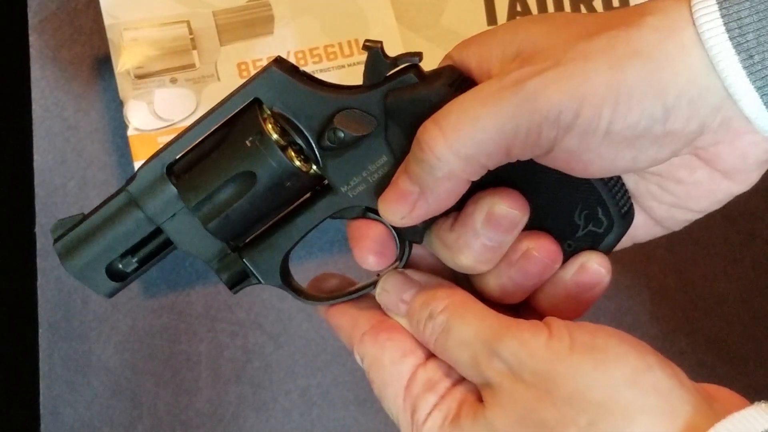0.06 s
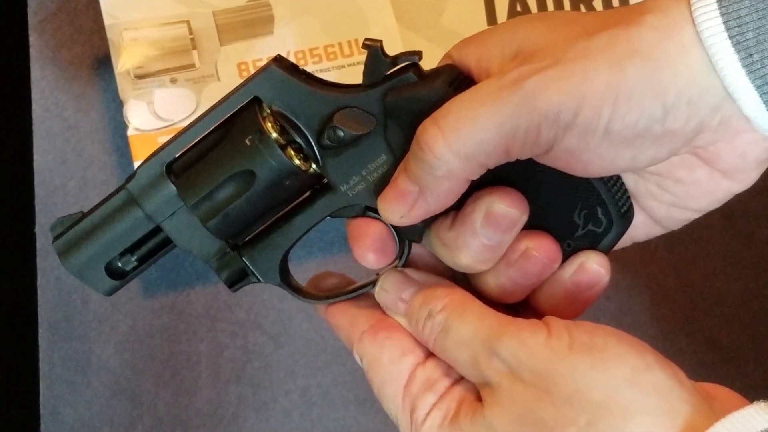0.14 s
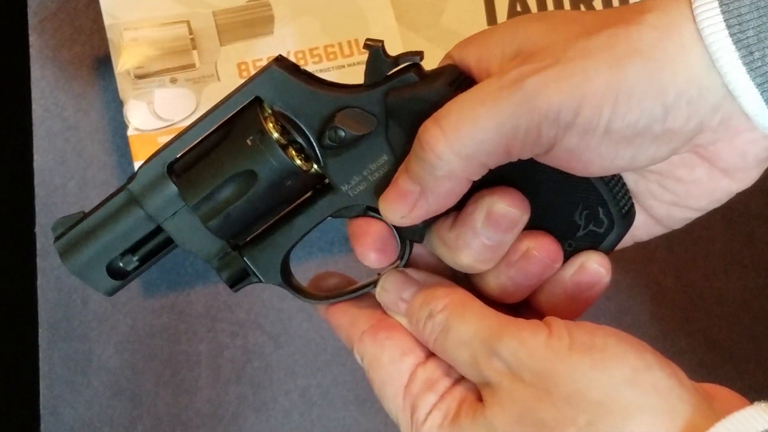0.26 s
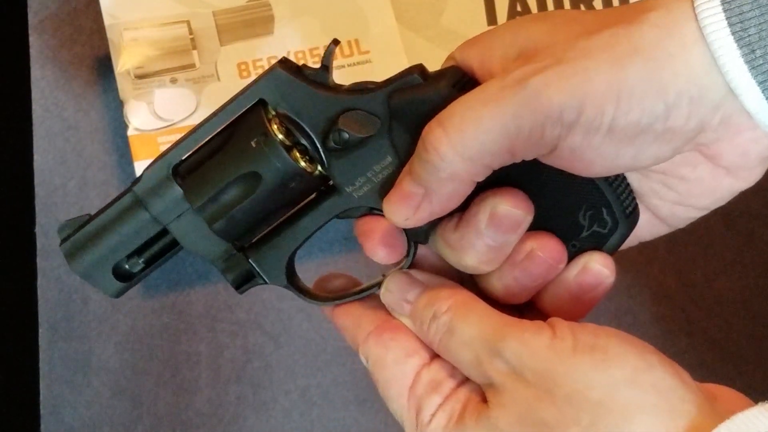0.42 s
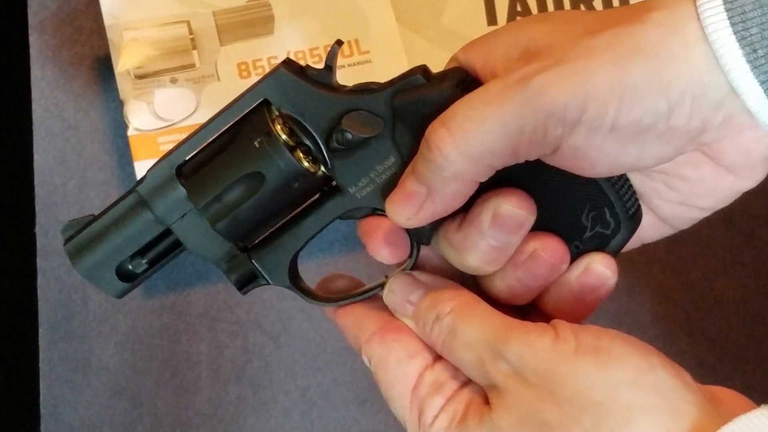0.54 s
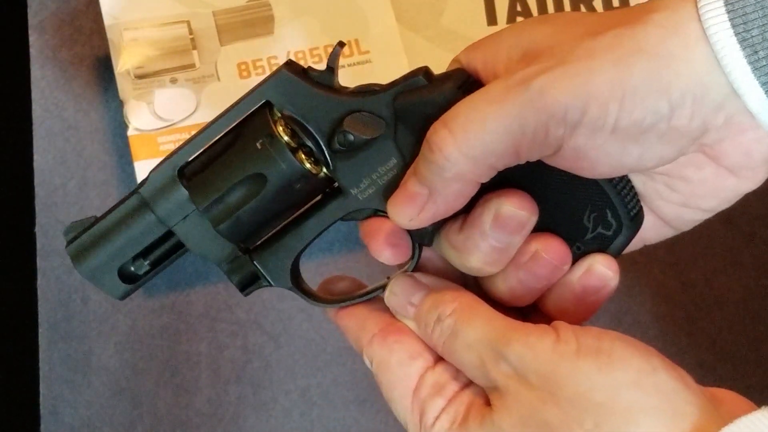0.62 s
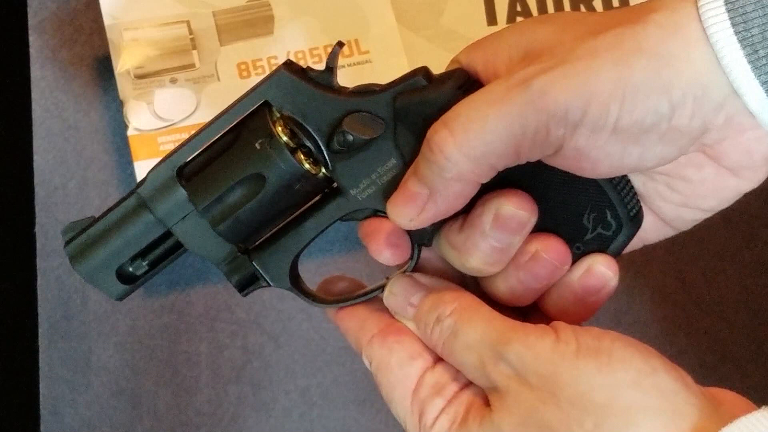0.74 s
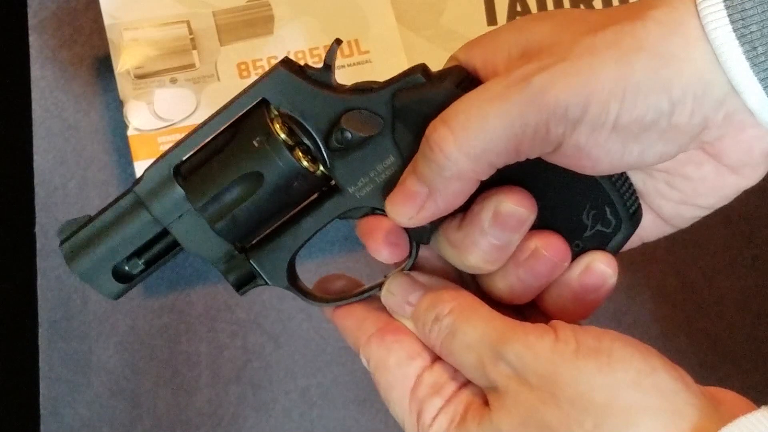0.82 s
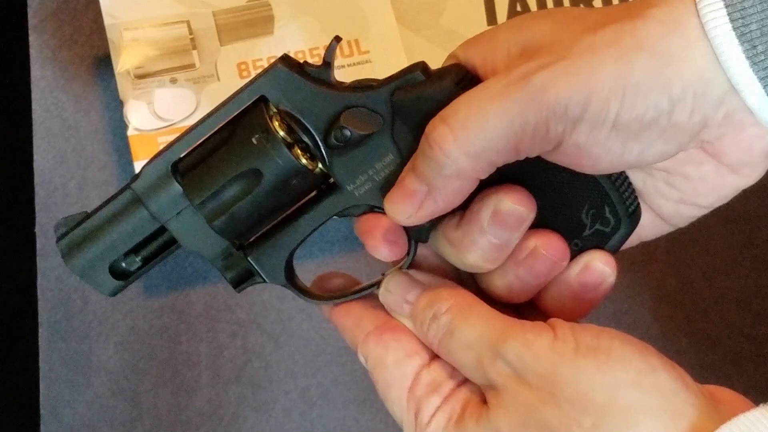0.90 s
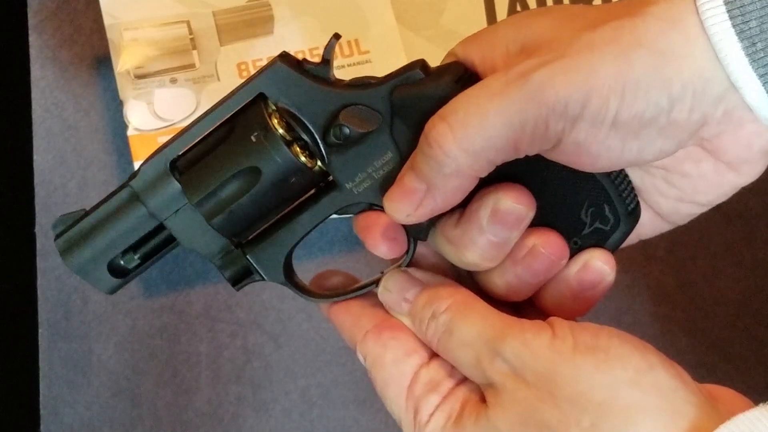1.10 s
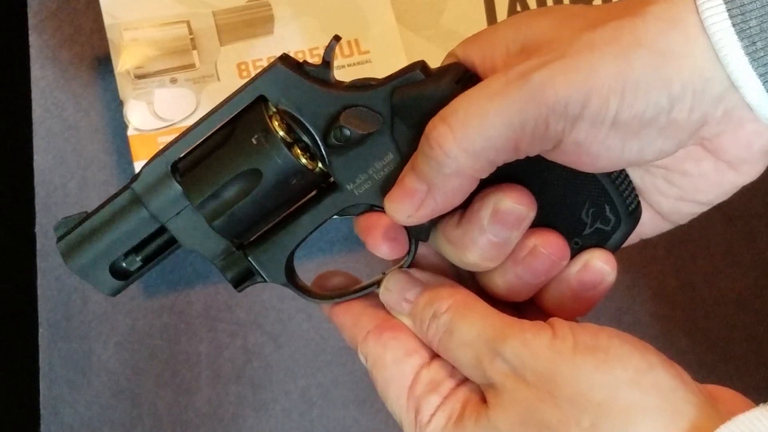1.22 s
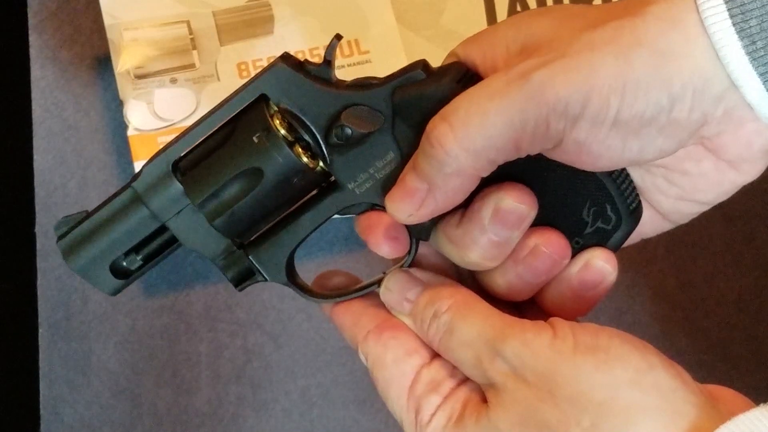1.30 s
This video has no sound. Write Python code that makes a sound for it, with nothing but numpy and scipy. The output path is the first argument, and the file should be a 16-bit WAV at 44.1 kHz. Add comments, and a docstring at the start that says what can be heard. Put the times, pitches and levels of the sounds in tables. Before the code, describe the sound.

A small revolver is handled close to the microphone in a quiet room. Faint low rumble and slight hiss come first. At 0.25 s the hammer is cocked: a loud cluster of steel contacts within about 15 milliseconds, with brief ringing and a short bright room tail. Barely audible finger rubs follow, around 0.6 to 1.03 s. At 1.34 s the hammer falls with a quieter, tighter snap, without a gunshot.

```python
"""A faint low rumble is heard first; then a small revolver is cocked close by in a quiet room.
Fingers rub the grip, and about a second after the cocking the hammer falls on an empty case.
Each click is a cluster of steel contacts: filtered noise bursts that crack and excite decaying sine modes.
The room answers with a short bright tail of noise, decaying band by band, and one lingering resonance.
Rumble and hiss are steady shaped noise."""
import sys
import numpy as np
from scipy import signal
from scipy.fft import rfft, irfft, next_fast_len
from scipy.io import wavfile

SR = 44100
rng = np.random.default_rng(int(sys.argv[2]) if len(sys.argv) > 2 else 0)


def digitize_waveform(pressure):
    """Quantize a signal to 16-bit integers and store it at the path in sys.argv[1].

    Rows of a 2-D input are taken as channels; values are limited to [-1, 1].
    """
    field = np.atleast_2d(pressure).T
    bounded = np.clip(field, -1, 1)
    quanta = np.round(bounded * 32767).astype(np.int16)
    wavfile.write(sys.argv[1], SR, quanta)


N = 59535  # length [samples]

# Contacts of hammer, cylinder stop and sear while cocking:
# (start [s], relative level [dB], treble lift [dB], nominal burst t60 [s])
COCKING_CONTACTS = [(.2422, -25, 6.5, .009), (.2457, -8.5, -2.5, 0.0019), (.2463, 2, 0.5, 0.0024),
                    (.2473, -7, 3, 0.0057), (.2502, -3, -11.5, 0.0062), (.2526, -10.5, 0.5, 0.0038),
                    (.2533, -2, -0.5, 0.0072), (.2555, -10.5, -1, 0.0052), (.2570, -8, -8, 0.0089),
                    (.2580, -8, 0, .003)]
# Contacts of the released sear, hammer and firing pin:
# (start [s], relative level [dB], treble lift [dB], nominal burst t60 [s])
FALL_CONTACTS = [(1.3256, -32.5, -29, 0.0055), (1.3317, -46, 19, 0.0032), (1.3372, -41, -3, 0.011),
                 (1.3400, -26.5, 24, 0.0015), (1.3405, -8.5, -2.5, 0.0016), (1.3438, -18, 8.5, 0.0013)]
# Spectral colour of the cocking contacts: (frequency [Hz], relative density [dB per Hz])
COCKING_COLOUR = [(60, -35), (170, -18), (420, -14), (900, -4.5), (1220, -7), (1500, 0.5), (2150, 3),
                  (2630, -5), (3000, -0.5), (3700, -8), (4800, -6), (6400, -15), (8200, -27), (9700, -19.5),
                  (11000, -7), (12300, -3), (15300, -8.5), (16500, -26.5)]
# Spectral colour of the hammer-fall contacts: (frequency [Hz], relative density [dB per Hz])
FALL_COLOUR = [(60, -32), (400, -13.5), (750, -5.5), (1000, 2.5), (1300, -10.5), (1950, -2.5), (2500, -7.5),
               (3400, -16), (4500, -6), (6100, -15), (7400, -27.5), (9600, -22.5), (10700, -11),
               (14400, -14), (15500, -29)]
# Vibration modes of the gun's steel: (frequency [Hz], relative level [dB], t60 [s])
STEEL_MODES = [(945, -10, .14), (1030, -7, .08), (1484, -5, .22), (1680, -7, .18), (1926, -4, .19),
               (2245, -1, .21), (2440, -7, .2), (2780, -9, .22), (2852, -4, .2), (4757, -7, .21),
               (11965, -5, .19), (12103, -2, .18), (12708, -10, .16), (14040, -11, .14)]
# Reverberation of the room: (band centre [Hz], relative level [dB], t60 [s])
ROOM_BANDS = [(150, -7.5, .26), (330, -4, .3), (500, 2, .3), (755, -8.5, 0.33), (1100, -2, .27),
              (1600, -4.5, 0.29), (2700, -1.5, .275), (5000, -0.5, .28), (8033, 3, 0.25), (12000, 3, .2),
              (15500, -5.5, .135)]
# Side level relative to the mid, given to the room's noise: (frequency [Hz], level [dB])
ROOM_WIDTH = [(100, -58.5), (500, -39.5), (2000, -44), (5000, -37.5), (12000, -26.5)]
# Fingers shifting on the grip:
# (middle [s], width at 1/e [s], noise level before the envelope [dB], centre frequency [Hz])
GRIP_RUBS = [(.58, .2, -78.5, 551.6), (.87, .08, -75, 444.3), (1.019, 0.058, -68, 190),
             (1.025, 0.015, -70.5, 601.9)]
# Spectral colour of rumble and hiss: (frequency [Hz], relative density [dB per Hz])
AIR_COLOUR = [(15, -14.5), (30, -12), (60, -0.5), (85, -3), (125, -7), (155, -17.5), (190, -13),
              (310, -20.5), (440, -17), (560, -25), (800, -27), (1250, -33.5), (2500, -39), (5000, -48.5),
              (8500, -54), (12500, -50), (15000, -68)]

CRACK_DB, COCK_RING_DB, FALL_RING_DB = 6.5, -37, -38  # gains added to the contact levels
CHATTER_DB, CHATTER_T60_S = -2, 0.019  # loose parts buzz on after each contact
TREBLE_HZ = 5100  # half of a contact's treble lift acts here
ROOM_DB, ROOM_BUILD_S = 6, 0.0031  # gain and build-up time constant
ROOM_MODE_HZ, ROOM_MODE_DB, ROOM_MODE_T60_S = 501, -52.5, .4
RUB_WIDTH_OCT = 0.6  # standard deviation of the rub's spectral bell
AIR_DB = -63.5  # RMS level
TREBLE_LEFT_DB = 2.7  # left over right at the top
CEILING, TOP_HZ = .55, 16000  # saturation amplitude, low-pass edge

T = np.arange(N) / SR
HALF = next_fast_len(N)
HZ = np.arange(HALF + 1) * SR / (2 * HALF)


def click(contacts, colour, ring_db):
    """Impact excitation: every contact cracks, shakes loose parts and sets the steel modes ringing."""
    body_db = curve(*np.array(colour).T)
    out = np.zeros(N)
    for start, db, lift_db, t60 in contacts:
        push = contact(t60) + undb(CHATTER_DB) * contact(CHATTER_T60_S)
        colour_filter = causal(body_db + lift_db * treble(HZ))
        crack = wave(spectrum(push) * colour_filter)
        first = min(int(start * SR), N - 1)
        out[first:] += undb(CRACK_DB + db) * crack[:N - first]
    for hz, db, t60 in STEEL_MODES:
        envelope = pile_up(contacts, hz, dying(t60))
        tone = np.sin(2 * np.pi * (hz * T + rng.random()))
        out += undb(ring_db + db) * envelope * tone
    return out


def contact(t60, size=1024):
    """Broadband impact: a decaying noise burst with a nearly even spectrum and unit energy."""
    fade = undb(-60 * T[:size] / max(t60, .0005))
    burst = rng.standard_normal(size) * fade
    for _ in range(4):
        # flatten the spectrum, keep the phase, then restore part of the decay
        flat = irfft(np.exp(1j * np.angle(rfft(burst))))
        burst = flat * np.sqrt(fade)
    return burst / np.linalg.norm(burst)


def treble(hz):
    """High-frequency weighting: the share of a contact's treble lift that acts at this frequency."""
    return hz ** 2 / (hz ** 2 + TREBLE_HZ ** 2)


def pile_up(contacts, hz, fade):
    """Energy addition: the envelope of a vibration to which every contact adds its power."""
    power = np.zeros(N)
    for start, db, lift_db, _ in contacts:
        first = min(int(start * SR), N - 1)
        gain = undb(db + lift_db * treble(hz))
        power[first:] += (gain * fade[:N - first]) ** 2
    return np.sqrt(power)


def dying(t60):
    """Exponential damping: decay from 1, by 60 dB in t60 seconds."""
    return np.exp(-np.log(1000) * T / t60)


def room(contacts, colour):
    """Diffuse reverberation: mid and side noise builds up fast and decays by band; one mode lingers."""
    build = 1 - np.exp(-T / ROOM_BUILD_S)
    noise = spectrum(rng.standard_normal((2, N))) * undb(curve(*np.array(colour).T))
    noise[1] *= undb(curve(*np.array(ROOM_WIDTH).T))
    centres = np.array(ROOM_BANDS)[:, 0]
    mid_side = np.zeros((2, N))
    # each row of the identity matrix gives one triangular band, crossfading into its neighbours
    for band, (hz, db, t60) in zip(np.eye(len(ROOM_BANDS)), ROOM_BANDS):
        fade = build * dying(t60)
        envelope = pile_up(contacts, hz, fade / np.linalg.norm(fade))
        band_noise = wave(noise * curve(centres, band))
        mid_side += undb(ROOM_DB + db) * band_noise * envelope
    hollow = pile_up(contacts, ROOM_MODE_HZ, build * dying(ROOM_MODE_T60_S))
    mid_side[0] += undb(ROOM_MODE_DB) * hollow * np.sin(2 * np.pi * ROOM_MODE_HZ * T)
    return mid_side


def fingers():
    """Friction noise: skin rubs softly on the grip, as band-limited noise under a bell envelope."""
    out = np.zeros(N)
    for middle, length, db, hz in GRIP_RUBS:
        octaves = np.log2((HZ + 1) / hz)
        bell = np.exp(-.5 * (octaves / RUB_WIDTH_OCT) ** 2)
        rub = wave(spectrum(rng.standard_normal(N)) * bell)
        envelope = np.exp(-(2 * (T - middle) / length) ** 2)
        out += undb(db) * rub / np.std(rub) * envelope
    return out


def air():
    """Stationary noise: Gaussian noise is shaped into a steady low rumble with a faint hiss."""
    noise = rfft(rng.standard_normal(2 * HALF))
    x = wave(noise * undb(curve(*np.array(AIR_COLOUR).T)))
    return undb(AIR_DB) * x / np.std(x)


def undb(db):
    """Level law: decibels to amplitude gain."""
    return 10 ** (np.asarray(db) / 20)


def spectrum(x):
    """Fourier analysis, zero-padded to leave room for tails."""
    return rfft(x, 2 * HALF)


def wave(s):
    """Fourier synthesis: back from spectrum to sound."""
    return irfft(s, 2 * HALF)[..., :N]


def curve(hz, values):
    """Logarithmic interpolation: points joined by lines on a log-frequency axis."""
    return np.interp(np.log(HZ + 1), np.log(hz), values)


def causal(db):
    """Minimum phase: folding the cepstrum gives a causal filter with the given gains."""
    cepstrum = irfft(np.log(undb(db)))
    cepstrum[1:HALF] *= 2
    cepstrum[HALF + 1:] = 0
    return np.exp(rfft(cepstrum))


def scene():
    """Superposition: both clicks, room, fingers and air; the mid's highest treble leans left."""
    gun = click(COCKING_CONTACTS, COCKING_COLOUR, COCK_RING_DB)
    gun += click(FALL_CONTACTS, FALL_COLOUR, FALL_RING_DB)
    tail, side = room(COCKING_CONTACTS, COCKING_COLOUR) + room(FALL_CONTACTS, FALL_COLOUR)
    mid = spectrum(gun + tail + fingers() + air())
    lean_db = TREBLE_LEFT_DB * np.clip((HZ - 10000) / 4000, 0, 1)  # full from 14 kHz up
    left_right = wave(mid * undb(np.array([lean_db, -lean_db]) / 2))
    return left_right + np.array([side, -side])


def record(dry):
    """Saturation and band limiting: tanh rounds the peaks, then an elliptic low-pass cuts the top."""
    rounded = CEILING * np.tanh(dry / CEILING)
    # order 8, 0.2 dB ripple, 70 dB rejection
    low_pass = signal.ellip(8, .2, 70, TOP_HZ, fs=SR, output="sos")
    return signal.sosfilt(low_pass, rounded)


dry = scene()
out = record(dry)
digitize_waveform(out)
```